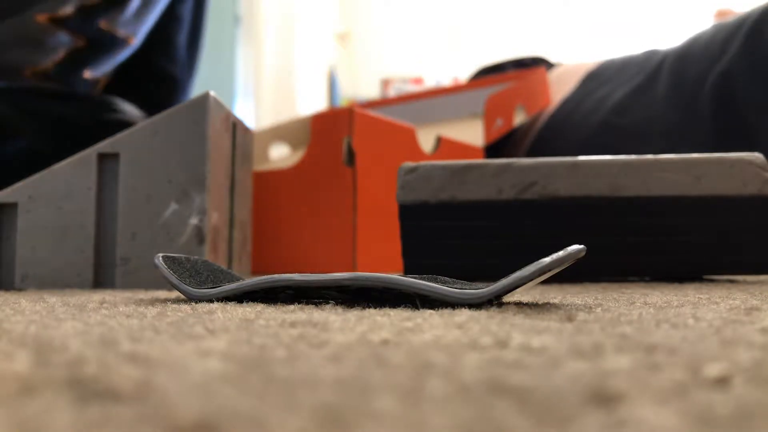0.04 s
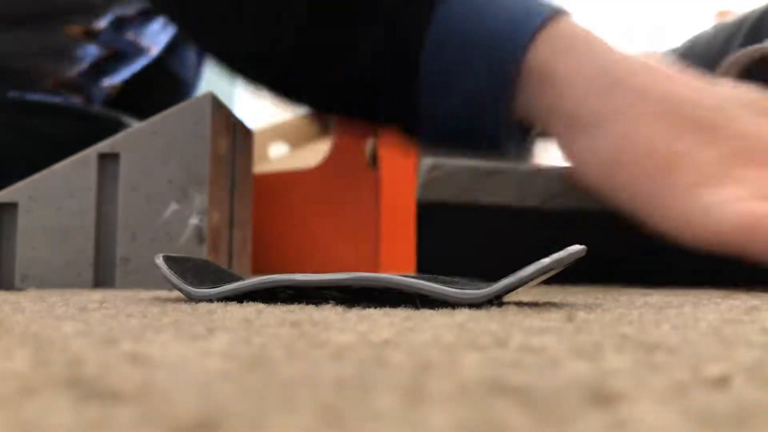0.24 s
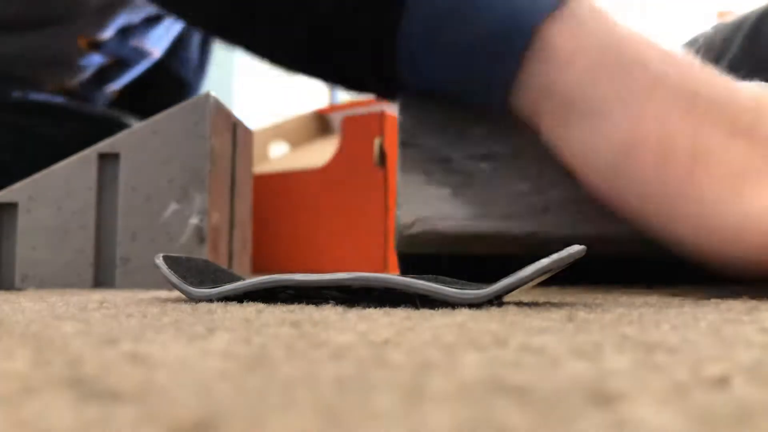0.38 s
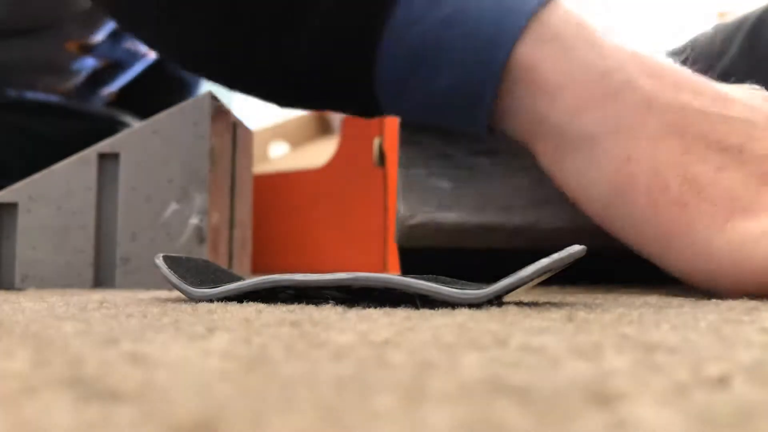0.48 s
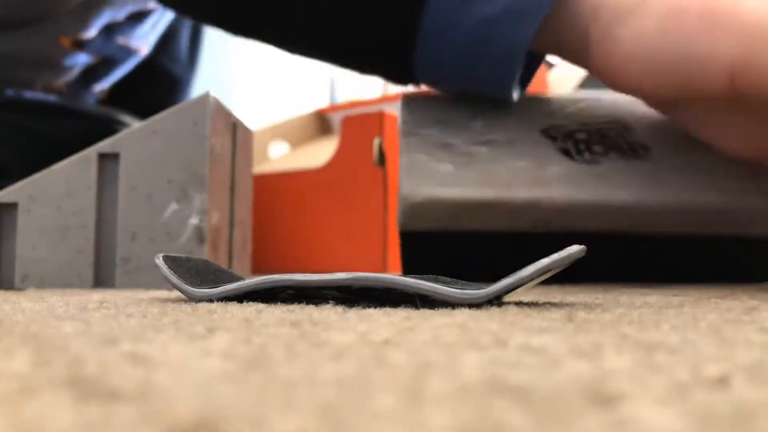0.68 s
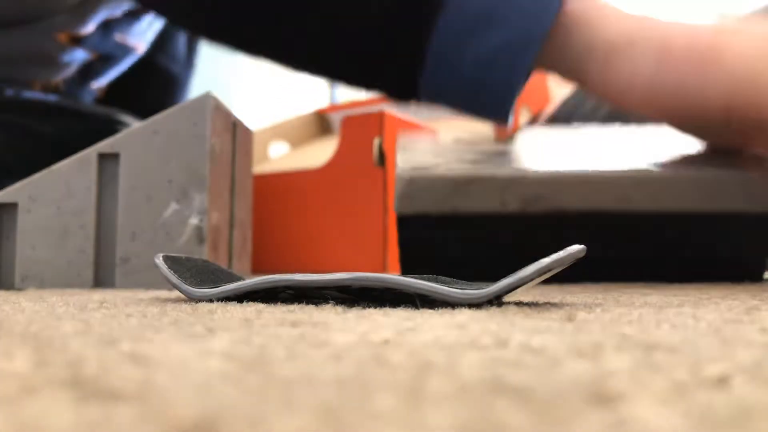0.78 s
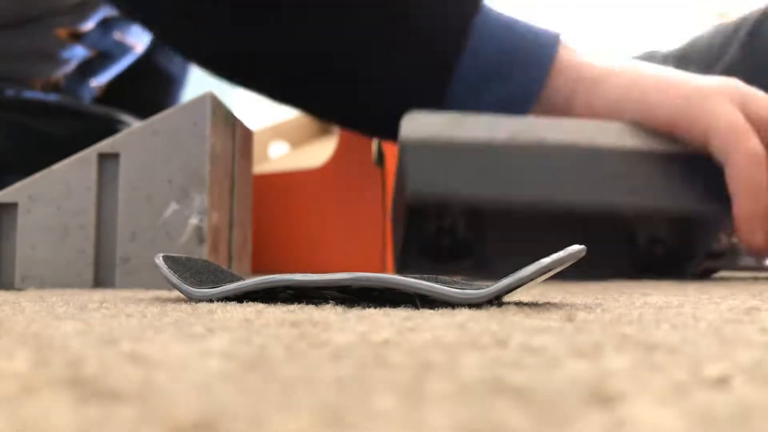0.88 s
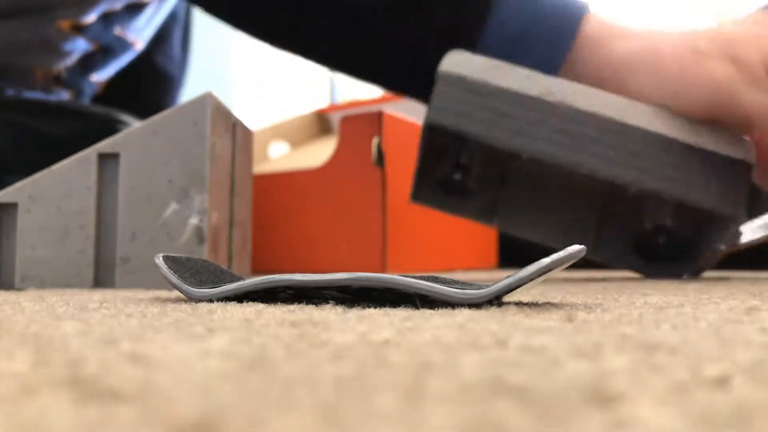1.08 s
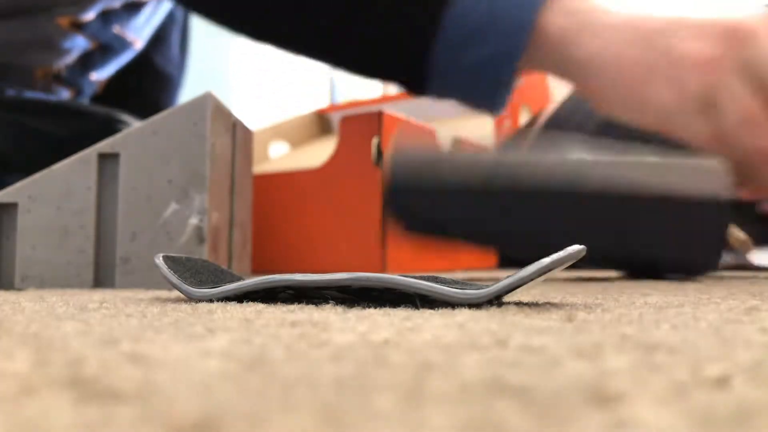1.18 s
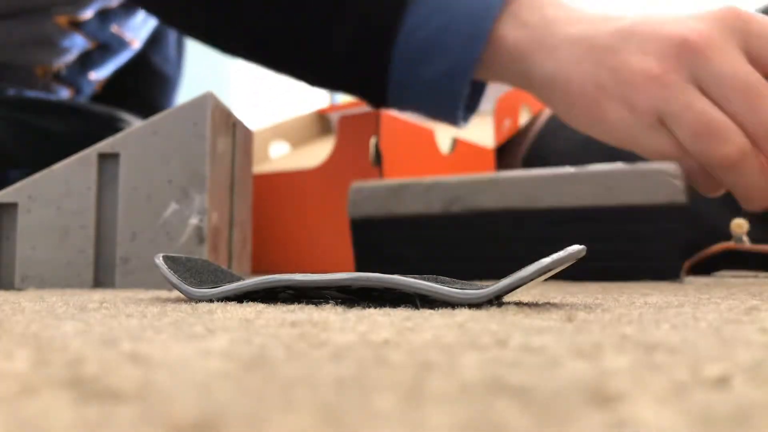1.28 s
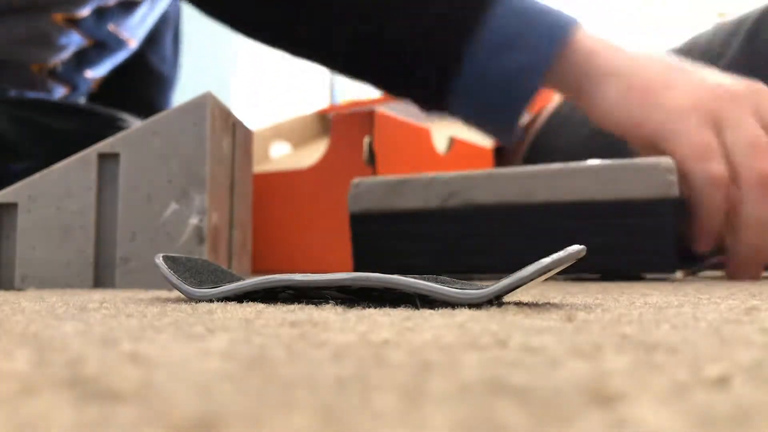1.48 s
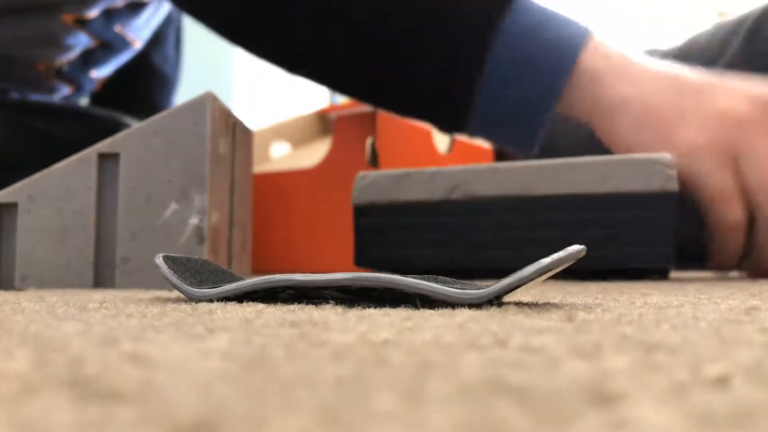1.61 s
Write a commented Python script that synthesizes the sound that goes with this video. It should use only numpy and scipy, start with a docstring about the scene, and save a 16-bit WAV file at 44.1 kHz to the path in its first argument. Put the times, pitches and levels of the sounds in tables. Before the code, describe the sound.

Close up in a quiet carpeted room, a toy skateboard snaps and clatters onto a small ledge after a loud low floor thud, followed by lighter handling knocks, a gritty scrape, a soft thump and a brief carpet rub.

```python
"""Fingerboard flick onto a ledge

Close microphone in a quiet carpeted room: a fingerboard is popped, clacks onto a small hollow ledge
and rattles off. The ledge is then grabbed, scraped, set down and pushed along the carpet.
Board and ledge are noise cracks with damped modes; rubbing is noise and random slips.
Blows to the floor send a bending wave whose treble arrives first, and leave the floor booming."""
import sys
import numpy as np
from scipy import signal
from scipy.fft import rfft, irfft, next_fast_len
from scipy.io import wavfile

SR = 44100
rng = np.random.default_rng(int(sys.argv[2]) if len(sys.argv) > 2 else 0)


def to_wav(sig):
    """Store sig (one row per channel, or 1-D mono) as 16-bit WAV at the path in sys.argv[1].

    Samples outside -1..1 are clipped; the rate is SR.
    """
    pcm = np.clip(np.atleast_2d(sig), -1, 1) * 32767
    pcm = np.round(pcm).astype(np.int16)
    wavfile.write(sys.argv[1], SR, pcm.T)  # frames by channels


N = 72765
T = np.arange(N) / SR  # time [s]


def amp(db):
    """Gain of a level in dB."""
    return 10 ** (np.asarray(db) / 20)


def unit(x):
    """x at rms 1."""
    return x / np.sqrt(np.mean(x ** 2) + 1e-20)


def along(points, hz):
    """Read (frequency [Hz], value) points on a log frequency axis."""
    f, value = np.transpose(points)
    return np.interp(np.log(hz + 1), np.log(f + 1), value)


def levels(rows):
    """Gain per sample for each dB column, fading away outside the curve."""
    s, *columns = np.transpose(rows)
    outside_s = np.abs(T - np.clip(T, s[0], s[-1]))
    fade = np.exp(-outside_s / .005)
    return [fade * amp(np.interp(T, s, db)) for db in columns]


def coloured(x, points):
    """x through a causal minimum-phase filter with the (frequency [Hz], level [dB]) shape."""
    m = 2 * next_fast_len(len(x))
    gain = amp(along(points, np.fft.rfftfreq(m, 1 / SR)))
    cepstrum = irfft(np.log(gain))
    cepstrum[1:m // 2] *= 2  # folding the cepstrum makes the filter causal
    cepstrum[m // 2 + 1:] = 0
    return irfft(rfft(x, m) * np.exp(rfft(cepstrum)))[:len(x)]


def noise(points):
    """Coloured noise of rms 1."""
    return unit(coloured(rng.standard_normal(N), points))


def random_slips(count, per_s):
    """Impulses of random size at random instants, per_s of them a second on average."""
    return (rng.random(count) < per_s / SR) * rng.standard_normal(count)


def ring(modes, t, scatter_db=2):
    """Damped modes, each a little different in level and sign at every blow."""
    total = np.zeros(len(t))
    for hz, db, t60 in modes:
        decay = amp(db + scatter_db * rng.normal() - 60 * t / t60)
        total += decay * np.sin(2 * np.pi * hz * t) * rng.choice([-1, 1])
    return total


def add(out, s, x):
    """Mix x into out at time s."""
    i = round(s * SR)
    out[i:i + len(x)] += x[:N - i]


# Still air of the room: (frequency [Hz], relative level [dB])
AIR_COLOUR = [(25, -24.5), (110, -10.5), (220, -16.5), (1200, -33), (15000, -42.5)]
AIR_DB = -68  # rms at the microphone, ahead of its band limits


def room_air():
    """The steady background of the quiet room is coloured noise."""
    return amp(AIR_DB) * noise(AIR_COLOUR)


# Reverberation of the furnished room: (frequency [Hz], decay time t60 [s])
ROOM_T60 = [(150, 0.33), (5000, 0.4), (15000, 0.13)]
ROOM_DB = -19.5  # room answer against the close sound


def room(x):
    """The short answer of a furnished room: noise that dies at its own rate in each band."""
    hz, t, z = signal.stft(rng.standard_normal(SR // 2), SR, nperseg=256)
    decay = amp(-60 * t / along(ROOM_T60, hz)[:, None])
    tail = signal.istft(z * decay, SR, nperseg=256)[1]
    tail_t = np.arange(len(tail)) / SR
    tail = tail * (1 - np.exp(-(tail_t / 0.0078) ** 2))  # the room answers a little late
    return signal.fftconvolve(x, tail / np.linalg.norm(tail))[:N]


# Wheels and sleeve close by: (time [s], level [dB])
ROLL_LEVEL = [(.08, -78.5), (.26, -61.5), (.33, -51.5), (.52, -60), (.72, -69.5)]
# Their colour: (frequency [Hz], relative level [dB])
ROLL_COLOUR = [(650, 2), (1200, -5.5), (1900, -6), (3200, -9), (4600, -9), (6400, -14.5), (15000, -21)]


def roll():
    """Wheels and sleeve rustle as smooth noise, with tiny rattles made of random impulses."""
    rattles = unit(coloured(random_slips(N, 400), ROLL_COLOUR))
    return levels(ROLL_LEVEL)[0] * unit(noise(ROLL_COLOUR) + amp(-2.0) * rattles)


# The push along the carpet: (time [s], hiss level [dB], rumble level [dB])
SLIDE_LEVEL = [(1.32, -88, -69), (1.36, -67, -50.5), (1.49, -58.5, -57), (1.55, -59, -63.5),
               (1.65, -61.5, -61)]
# Colour of the rubbed pile: (frequency [Hz], relative level [dB])
CARPET_HISS = [(500, -3.5), (1800, -5.5), (2150, 7.5), (2450, 3.5), (2900, -16.5), (3600, 6.5), (4000, -14),
               (5900, -5), (6400, -17), (15000, -39)]
# Colour of the low rumble: (frequency [Hz], relative level [dB])
CARPET_RUMBLE = [(50, -22), (150, 0), (380, -1), (520, -8.5), (1900, -35)]
# Stick-slip hum of the sliding ledge: (time [s], frequency [Hz], rms level [dB])
HUM = [(1.373, 410, -48), (1.409, 362.6, -58), (1.504, 291, -53), (1.6, 320.5, -62.5)]


def slide():
    """Carpet pile hisses and rumbles under the ledge, which hums as it sticks and slips."""
    hiss_gain, rumble_gain = levels(SLIDE_LEVEL)
    s, hz, db = np.transpose(HUM)
    hum_gain = levels(np.transpose([s, db]))[0] * np.sqrt(2)
    cycles = np.cumsum(np.interp(T, s, hz)) / SR
    hum = hum_gain * np.sin(2 * np.pi * cycles)
    return hiss_gain * noise(CARPET_HISS) + rumble_gain * noise(CARPET_RUMBLE) + hum


# Blows on the floor: (time [s], level [dB], softness corner [Hz],
# spread of the wave [s root Hz], which grows with distance)
THUMPS = [(.2, -53.5, 148, .36), (0.2951, -17.5, 694, 0.37), (0.552, -43, 201, 0.39),
          (0.9212, -44, 99, .36), (1.339, -30, 225, .21), (1.405, -41, 150, .21), (1.464, -42.5, 200, .21)]
# Colour of the bending wave: (frequency [Hz], relative level [dB])
FLOOR_WAVE = [(25, -48), (50, -7.5), (100, 3), (210, -3), (420, -13.5), (700, -13), (1000, -19.5),
              (1500, -63)]
# Floor modes: (frequency [Hz], level against the thump [dB], decay time t60 [s])
FLOOR_MODES = [(140.2, -14, 0.37), (207.4, -21.5, 0.16)]
BOOM_DELAY_S = 0.0403
JOIST_SHARE, JOIST_S, JOIST_HZ = .8, .006, 400  # scatter by joists: strength, decay [s], corner [Hz]


def floor_thumps():
    """Bending waves run through the floor, late by spread over root frequency; its modes boom on."""
    out, t = np.zeros(N), T[:SR // 2]
    m = 2 * len(t)
    hz = np.fft.rfftfreq(m, 1 / SR)
    for s, db, soft_hz, spread in THUMPS:
        gain = amp(along(FLOOR_WAVE, hz)) / np.sqrt(1 + (hz / soft_hz) ** 4)
        # joists scatter the short waves
        echoes = rng.standard_normal(len(t)) * np.exp(-t / JOIST_S)
        scatter = rfft(echoes / np.linalg.norm(echoes), m) * hz ** 2 / (hz ** 2 + JOIST_HZ ** 2)
        gain = gain * (1 + JOIST_SHARE * scatter)
        # this phase delays each frequency by spread / sqrt(hz)
        wave = irfft(gain * np.exp(-2j * np.pi * 2 * spread * np.sqrt(hz)))[:len(t)]
        add(out, s, amp(db) * wave / np.abs(wave).max())
        swell = 1 - np.exp(-t / 0.007)
        add(out, s + BOOM_DELAY_S, amp(db) * ring(FLOOR_MODES, t, scatter_db=3) * swell)
    return out


# Hard rubbing on the ledge: (time [s], treble level [dB])
SCRAPE_LEVEL = [(.76, -64), (.87, -72.5), (.95, -61.5), (1.02, -74.5), (1.168, -73), (1.176, -39.5),
                (1.186, -36), (1.205, -70), (1.3, -80)]
# Colour of its grit: (frequency [Hz], relative level [dB])
SCRAPE_GRIT = [(2500, -56), (5900, 11.5), (6500, -3), (8300, 2), (15000, -5)]
SLIPS_PER_S = 2900  # for the scrape and the scuffs


def scrape():
    """Hard rubbing on the ledge adds a gritty treble of random slips and noise."""
    grit = unit(coloured(random_slips(N, SLIPS_PER_S), SCRAPE_GRIT))
    return levels(SCRAPE_LEVEL)[0] * unit(grit + noise(SCRAPE_GRIT))


# Modes of the hollow ledge: (frequency [Hz], relative level [dB], decay time t60 [s])
LEDGE_MODES = [(290, -5, .04), (410, -8, .055), (884, 2, .047), (1000, -6, .05), (1505, 1, .04),
               (2205, -4, .045), (2530, -5, .04), (2745, -3, .05), (4000, -5, .04), (4700, -5, .035),
               (5900, -8, .055)]
# The ledge scuffing and bumping as it is handled: (time [s], length [s], level [dB], brightness [Hz])
SCUFFS = [(0.795, 0.0055, -50.5, 1310), (0.836, 0.077, -51.5, 890), (0.87, 0.01, -50, 1190),
          (0.915, 0.019, -52, 755), (0.928, 0.026, -49, 1600), (1.105, 0.0046, -50.5, 890),
          (1.127, 0.0073, -47, 730), (1.139, 0.011, -45, 830), (1.15, 0.026, -56.5, 2900),
          (1.161, 0.017, -43.5, 1030), (1.1754, 0.014, -34, 2750), (1.201, 0.016, -61, 1730),
          (1.353, 0.015, -51, 445), (1.365, 0.014, -50.5, 740), (1.4654, 0.0073, -43.5, 254)]
# Colour of the dry rub: (frequency [Hz], relative level [dB])
SCUFF_COLOUR = [(130, 4.5), (400, 5), (620, -9), (950, 0), (1900, -15.5), (2850, -6), (3400, -14),
                (12000, -43)]
SCUFF_RING_DB, SCUFF_OCTAVES = -1, 1.33  # ring over the dry rub; width of a scuff's colour [octaves]
SCUFF_TOP_HZ = 3300
BLOW_S = .01  # span over which a blow's attack level is taken


def scuffs():
    """Each scuff is a short run of slips ringing the ledge with its own mode mix, dull or bright."""
    out, t = np.zeros(N), T[:SR // 5]
    hz = np.geomspace(30, SR / 2, 60)
    for s, length, db, bright_hz in SCUFFS:
        slips = random_slips(len(t), SLIPS_PER_S) * np.exp(-(t / length) ** 4)
        rung = signal.fftconvolve(slips, ring(LEDGE_MODES, t, scatter_db=4))[:len(t)]
        rub = unit(coloured(slips, SCUFF_COLOUR)) + amp(SCUFF_RING_DB) * unit(rung)
        around_bright = 1 / (1 + (np.log2(hz / bright_hz) / SCUFF_OCTAVES) ** 2)
        gain = around_bright / np.sqrt(1 + (hz / SCUFF_TOP_HZ) ** 8)
        rub = coloured(rub, np.transpose([hz, 20 * np.log10(gain)]))
        loudness = np.sqrt(np.mean(rub[t < length + BLOW_S / 2] ** 2))
        add(out, s, amp(db) * rub / loudness)
    return out


# Edges of the bands in which a hard blow is levelled: [Hz]
BAND_HZ = [150, 600, 1300, 3200, 7000, 16000]


def voiced(x, band_db):
    """Colour a blow so that its attack comes close to the given level in each band."""
    centres = np.sqrt(np.multiply(BAND_HZ[1:], BAND_HZ[:-1]))
    size = 2048
    for _ in range(2):  # the second pass refines the first
        spectrum = rfft(x[:round(BLOW_S * SR)], size)
        power = np.abs(spectrum) ** 2 * 2 / size / (BLOW_S * SR)
        now = np.histogram(np.fft.rfftfreq(size, 1 / SR), BAND_HZ, weights=power)[0]
        x = coloured(x, list(zip(centres, band_db - 10 * np.log10(now))))
    return x


TICK_T60 = 0.014  # decay of the first instant of contact [s]
FAVOUR_DB, FAVOUR_WIDTH = 7, 0.26  # lift of the favoured modes; its width as a share of the pitch
SMALL_BODY_HZ = 127  # the board and ledge radiate little below this


def clacks(hits, modes, crack, crack_db, crack_t60, tick_db=-np.inf):
    """Each is a crack, sharper with a tick, and a ring that leans to the modes near a favoured pitch."""
    out, t = np.zeros(N), T[:SR // 5]
    for s, favoured_hz, *band_db in hits:
        force = amp(-60 * t / crack_t60) + amp(tick_db - 60 * t / TICK_T60)
        burst = unit(coloured(rng.standard_normal(len(t)), crack)) * amp(crack_db) * force
        struck = []
        for hz, db, t60 in modes:
            nearness = np.exp(-(np.log(hz / favoured_hz) / FAVOUR_WIDTH) ** 2)
            struck.append((hz, db + FAVOUR_DB * nearness, t60))
        add(out, s, voiced(ring(struck, t) + burst, np.array(band_db)))
    small_body = signal.butter(2, SMALL_BODY_HZ, "high", fs=SR, output="sos")
    return signal.sosfilt(small_body, out)


# Knocks on the ledge: (time [s], frequency the contact point favours [Hz],
# then level [dB] in each band of BAND_HZ, ahead of the small-body cut)
LEDGE_HITS = [(.7343, 1505, -38.5, -32, -34, -38.5, -50.5), (.747, 1505, -40.5, -37, -41.5, -36, -41),
              (.908, 2700, -62, -52, -51, -55.5, -57), (.9635, 2640, -44.5, -44.5, -44.5, -54.5, -63.5),
              (.9885, 2700, -51.5, -49.5, -44.5, -52, -61), (1.0425, 2950, -59, -51.5, -48.5, -50.5, -51),
              (1.052, 2205, -60, -49.5, -54.5, -54.5, -61), (1.1735, 2780, -45, -47, -43.5, -44, -50.5),
              (1.1805, 2660, -43.5, -42, -35, -56.5, -42), (1.1955, 1505, -55.5, -49, -39.5, -49, -55),
              (1.2345, 2205, -68, -46, -36.5, -42.5, -44.5), (1.2777, 2650, -68, -51.5, -43, -52.5, -61),
              (1.3305, 290, -44.5, -58.5, -62, -60, -56.5)]
# Contact noise of the ledge: (frequency [Hz], relative level [dB])
LEDGE_CRACK = [(70, -21), (190, 13.5), (350, 10), (600, -8), (2600, 10), (3300, -3.5), (4100, 5.5),
               (5900, 0), (6400, -9.5), (8300, -1.5), (15000, -7.5)]


def ledge_knocks():
    """The hollow ledge is knocked: a short crack, then its modes ring."""
    return clacks(LEDGE_HITS, LEDGE_MODES, LEDGE_CRACK, crack_db=8, crack_t60=0.025)


# Contact noise of the board, also used for the light ticks: (frequency [Hz], relative level [dB])
BOARD_CRACK = [(150, -12), (600, -6), (1500, -4.5), (3200, -4), (4600, 13), (5700, 5), (6300, -10),
               (7300, 5.5), (11000, 0), (15000, -3)]
# Light bright ticks: the floor strike heard through the air, small board contacts, a ledge scuff:
# (time [s], level [dB])
LIGHT_TICKS = [(0.2938, -41), (0.4603, -42), (.579, -43), (.629, -53.5), (.938, -56)]
LIGHT_TICK_T60 = 0.029  # [s]


def light_ticks():
    """Floor strike through the air, small board contacts and a ledge scuff: bright decaying noise."""
    out, t = np.zeros(N), T[:SR // 10]
    for s, db in LIGHT_TICKS:
        tick = unit(coloured(rng.standard_normal(len(t)), BOARD_CRACK))
        add(out, s, amp(db - 60 * t / LIGHT_TICK_T60) * tick)
    return out


BOARD_CRACK_DB, BOARD_CRACK_T60, BOARD_TICK_DB = 17, 0.027, 1  # crack against the ring, [s], tick over crack
# The deck's pop, then the two rough cracks at the attack of the loud floor thump:
# (time [s], favoured frequency [Hz], then level [dB] in each band of BAND_HZ, ahead of the small-body cut)
POP_AND_CRACKS = [(.2198, 5400, -57, -54, -39.5, -35.5, -41.5), (.3075, 1500, -36, -42, -45.5, -48, -60),
                  (.3158, 1800, -49, -42, -45.5, -56.5, -38.5)]
# Short modes in the pop and the cracks: (frequency [Hz], relative level [dB], decay time t60 [s])
POP_MODES = [(2160, 5, 0.014), (4130, -14, 0.012), (4820, 13, 0.022)]


def pop_and_cracks():
    """The deck's pop, then two rough cracks at the loud thump's attack: tick, crack and very short ring."""
    return clacks(POP_AND_CRACKS, POP_MODES, BOARD_CRACK, BOARD_CRACK_DB, BOARD_CRACK_T60, BOARD_TICK_DB)


# Wheels and trucks landing on the ledge: (time [s], frequency the contact point favours [Hz],
# then level [dB] in each band of BAND_HZ, ahead of the small-body cut)
BOARD_HITS = [(.432, 1480, -41.5, -33.5, -30, -32.5, -33), (.4864, 1900, -34.5, -35.5, -31.5, -32, -32),
              (.5005, 1900, -72, -74, -49, -63, -66), (.5328, 1050, -51.5, -39.5, -45, -66, -58),
              (.5468, 1910, -47.5, -46.5, -40, -47, -47.5), (.6755, 1900, -78, -79, -54.5, -91, -66)]
# Modes of the board: (frequency [Hz], relative level [dB], decay time t60 [s])
BOARD_MODES = [(598, -2, .025), (863, -7, .05), (1110, -9, .06), (1500, 2, .022), (1865, -7, .085),
               (1915, -6, .05), (2520, 3, .05), (2640, 3, .04), (4050, 3, .05), (4650, 7, .038)]


def board_landings():
    """Wheels and trucks clack onto the ledge: tick, crack and the board's modes."""
    return clacks(BOARD_HITS, BOARD_MODES, BOARD_CRACK, BOARD_CRACK_DB, BOARD_CRACK_T60, BOARD_TICK_DB)


def scene():
    """Board, ledge and floor close to the microphone, in the quiet room."""
    handling = scrape() + scuffs()
    near = floor_thumps() + handling + ledge_knocks() + light_ticks() + pop_and_cracks() + board_landings()
    background = room_air() + roll() + slide()
    return (near + amp(ROOM_DB) * room(near) + background)[None]


TOP_HZ = 15850  # upper band limit of the microphone


def record(dry):
    """The microphone loses the deep bass and keeps almost nothing above its band limit."""
    m = next_fast_len(N + SR // 2)
    thin = signal.sosfilt(signal.butter(2, 45, "high", fs=SR, output="sos"), dry)
    steep_cut = np.sqrt(1 + (np.fft.rfftfreq(m, 1 / SR) / TOP_HZ) ** 160)
    return irfft(rfft(thin, m) / steep_cut, m)[:, :N]


dry = scene()
out = record(dry)
to_wav(out)
```